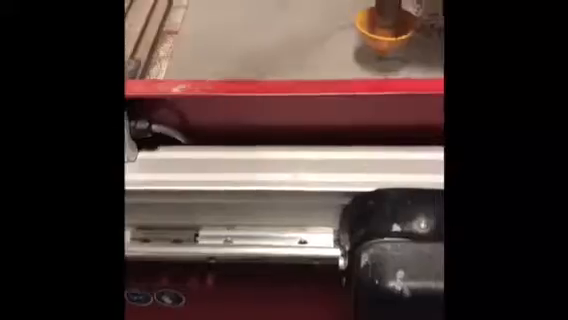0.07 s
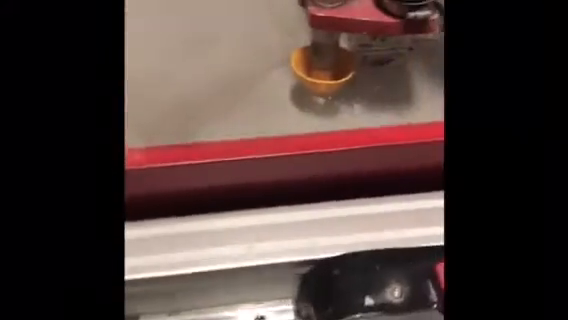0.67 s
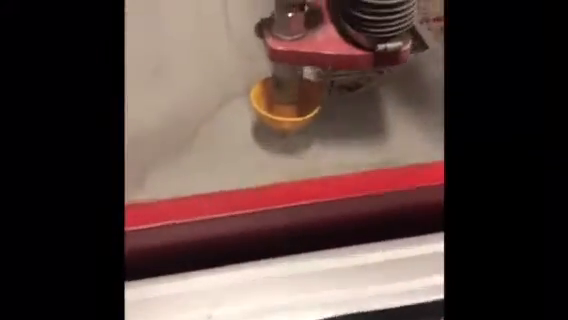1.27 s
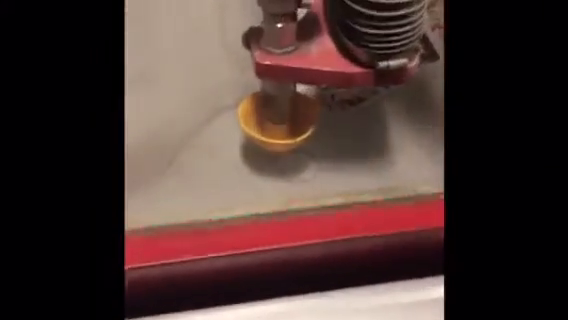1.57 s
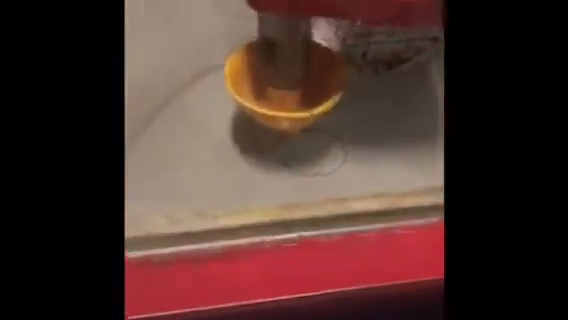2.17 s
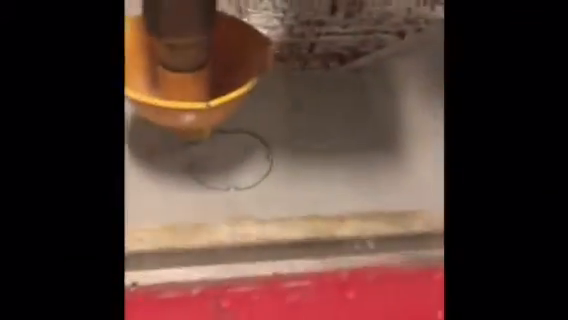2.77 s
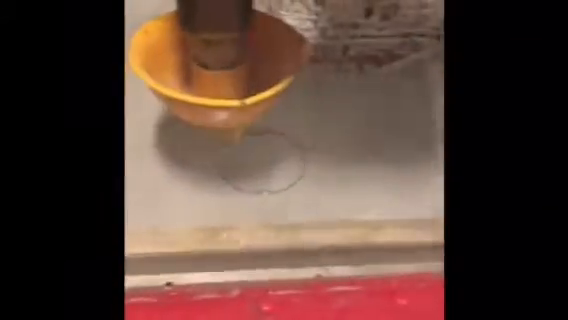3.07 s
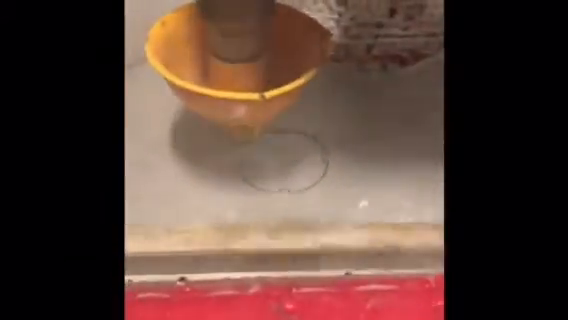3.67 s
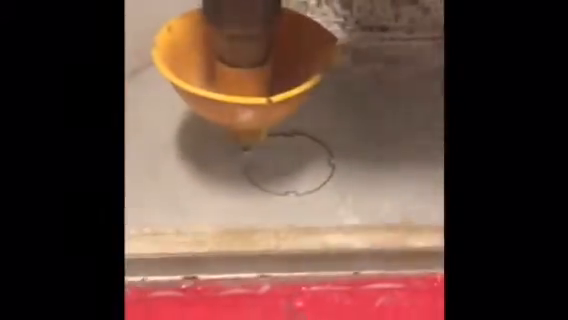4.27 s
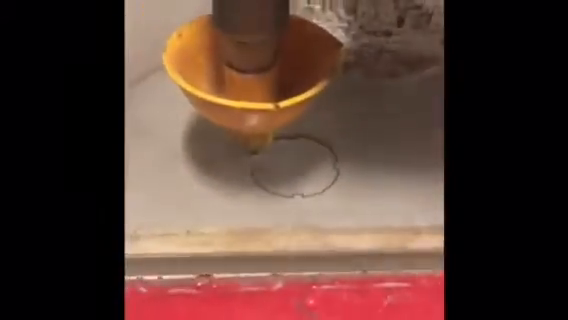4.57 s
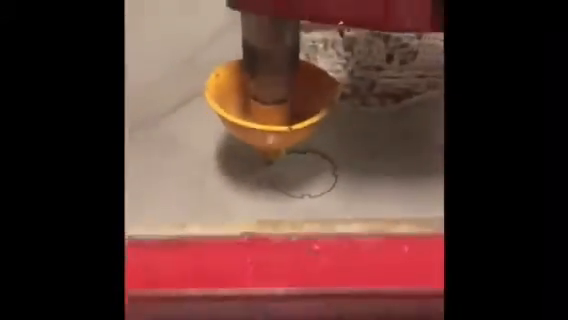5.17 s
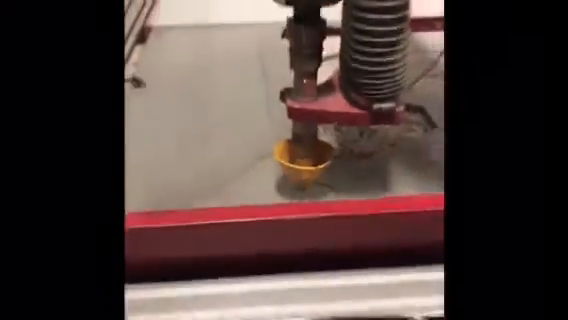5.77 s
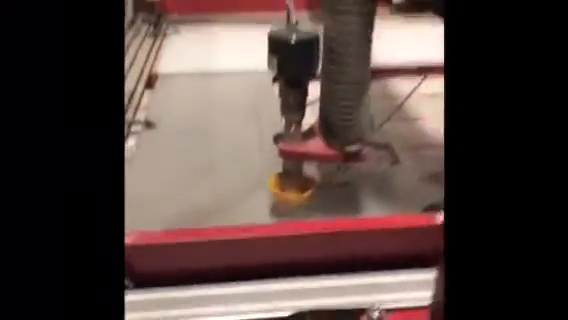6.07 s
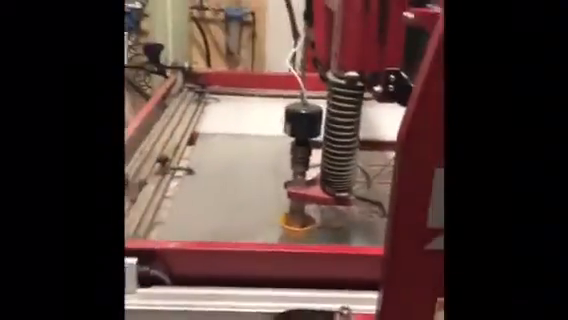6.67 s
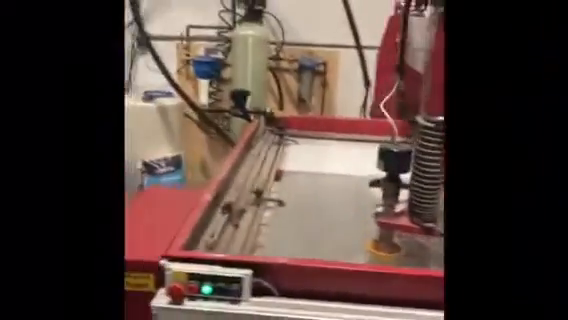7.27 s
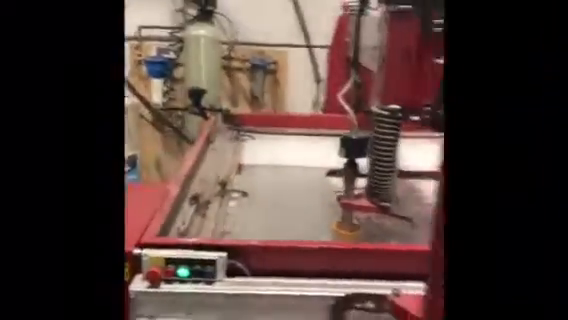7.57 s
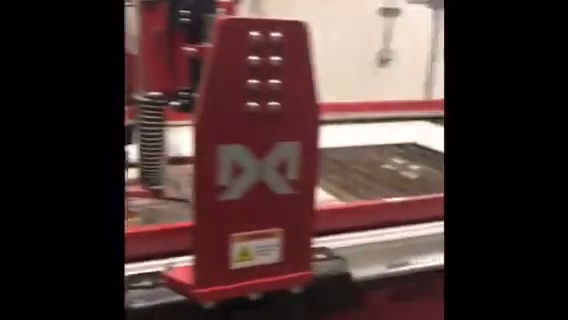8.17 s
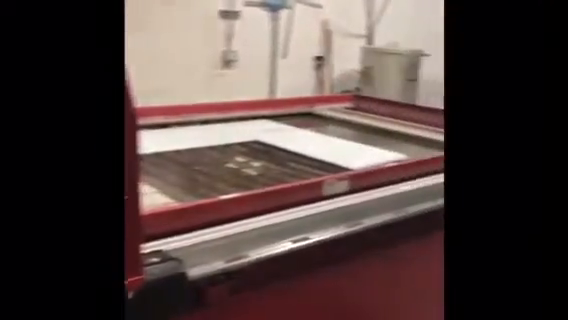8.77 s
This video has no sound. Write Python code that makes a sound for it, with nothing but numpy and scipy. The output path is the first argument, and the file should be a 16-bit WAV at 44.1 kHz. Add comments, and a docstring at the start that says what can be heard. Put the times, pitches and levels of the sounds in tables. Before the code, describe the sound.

A water jet cutter hisses and sputters loudly on stone, drops to a smooth hollow rush, then bites again over a faint pump hum.

```python
"""A workshop, at a water jet cutter on a stone slab; one small microphone leans in, steps back, walks round.
The jet sputters loudly while it bites, drops to a smooth hollow rush for two seconds, then bites again.
Slugs of water knock the sheet, whose bending waves arrive as falling chirps.
The spent jet churns the tank underneath, and the pressure pump hums behind."""
import sys
import numpy as np
from scipy import signal
from scipy.fft import rfft, irfft
from scipy.io import wavfile

SR = 44100
rng = np.random.default_rng(int(sys.argv[2]) if len(sys.argv) > 2 else 0)


def unload_audio(sound):
    """Save the sound as a 16-bit wav file, at the path given as the first command line argument."""
    columns = np.transpose(np.atleast_2d(sound))
    # keep every value between -1 and 1, then stretch to whole-number steps
    steps = np.round(np.clip(columns, -1, 1) * 32767)
    wavfile.write(sys.argv[1], SR, steps.astype(np.int16))


N = 398223
T = np.arange(N) / SR
HZ = np.maximum(np.arange(N // 2 + 1) * SR / N, 1)

# The valve opens, the jet runs free, the jet bites again.
OPEN_S, FREE_S, BITE_S = 0.086, 4.381, 6.541
# The microphone leans in to the nozzle, steps back, then goes round the gantry: start and end of each.
LEAN_S, STEP_BACK_S, ROUND_S = (1.68, 2.75), (4.9, 5.7), (6.94, 8.46)


def undb(db):
    """Decibels to gain."""
    return 10 ** (np.asarray(db) / 20)


def unit(x):
    """Scale to rms 1."""
    return x / np.std(x)


def response(points):
    """Gain at every frequency from (Hz, dB) points."""
    hz, db = np.transpose(points)
    return undb(np.interp(np.log(HZ), np.log(hz), db))


def colour(x, points):
    """Filter x through (Hz, dB) points; rms 1."""
    return unit(irfft(rfft(x) * response(points), N))


def blend(x, first, second, share):
    """Crossfade from one colour of x to another."""
    return (1 - share) * colour(x, first) + share * colour(x, second)


def walk(hz):
    """Smooth random wander, up to about hz; rms 1."""
    smooth = signal.butter(2, hz, fs=SR, output="sos")
    return unit(signal.sosfilt(smooth, rng.standard_normal(N)))


def step(at, rise):
    """Goes from 0 to 1 with a time constant, starting at a moment."""
    return 1 - np.exp(-np.maximum(T - at, 0) / rise)


def move(span):
    """Goes smoothly from 0 to 1 between two moments."""
    start, end = span
    return (1 - np.cos(np.pi * np.clip((T - start) / (end - start), 0, 1))) / 2


def swell(at, half):
    """A bell curve that rises to 1 at a moment and falls again."""
    return np.exp(-((T - at) / half) ** 2)


def spray(surge_db, sputter_db, crackle_db, grit_db, swing_db):
    """Countless droplet impacts; the jet surges, sputters and breaks into tiny slugs."""
    flow_db = surge_db * walk(9.9) + sputter_db * walk(170) + crackle_db * walk(850)
    # the pump supplies only so much: the spray swings between a lull and full flow
    flow_db = swing_db * np.tanh(flow_db / swing_db)
    mist = rng.standard_normal(N) * undb(flow_db + grit_db * rng.standard_normal(N))
    # single slugs strike as sharp one-sided snaps, more of them at full flow
    snaps = (rng.random(N) < 160 / SR * undb(flow_db)) * rng.uniform(2, 7, N)
    return unit(mist) - snaps


def scatter(x, share, sway_ms, span_ms, turn_count=10, count=13):
    """Many short reflections off the machine; each path changes length as the microphone moves."""
    fine = signal.resample_poly(x, 8, 1)  # for lags finer than a sample
    turns = np.linspace(0, T[-1], turn_count)
    out = x.copy()
    for place, sign, *drift in rng.uniform(-1, 1, (count, 2 + turn_count)):
        lag_ms = 1 + (span_ms - 1) * abs(place) + sway_ms * np.interp(T, turns, np.cumsum(drift))
        at = ((T - lag_ms / 1000) * 8 * SR).astype(int)
        out += np.sign(sign) * share / np.sqrt(count) * fine.take(at, mode="clip")
    return unit(out)


def cutting():
    """The jet bites the slab and throws spray back; colour and level depend on where one stands."""
    # The hiss from the front, close up, further back and side on. Each row: frequency in Hz, level in dB.
    front_colour = [(100, -28), (860, -25), (1080, -14), (1850, -12), (2110, -14.7), (3140, -6.7),
                    (3400, -9.2), (3790, -5.5), (4180, -8), (5730, -3.2), (12450, -5.3), (13220, 0),
                    (15590, -3)]
    close_colour = [(100, -18), (820, -13.9), (1850, -10.5), (2370, -13.5), (3010, -5.2), (3920, -7.1),
                    (5730, -3.9), (5990, 0.0), (7150, -5.5), (10510, -5.7), (11150, -1.6), (11540, -6.7),
                    (13090, -2.9), (15590, -4.6)]
    back_colour = [(100, -22), (820, -18.2), (2630, -10.1), (3920, -4.6), (4690, -6.7), (5080, -3.9),
                   (6240, 0.0), (7150, -11.1), (7800, -4.9), (8830, -6.3), (11410, -2.6), (12580, -6.4),
                   (13350, -3.3), (15590, -11.1)]
    side_colour = [(100, -28), (820, -18), (2240, -13), (3000, -8), (4600, -4), (5000, -1.5), (5600, -5.5),
                   (6400, -3.5), (7080, -14.5), (8050, -6.5), (9350, -11.5), (9730, -8), (12580, -9.7),
                   (13740, -7), (15590, -12)]
    # The spray falters briefly. Each row: centre in seconds, half length in seconds, dip in dB.
    lulls = [(.304, .006, -4), (0.526, .03, -4), (6.61, 0.014, -2.5), (6.976, 0.005, -1)]
    front_db, close_db, back_db, side_db = -13, -12, -15.5, -17
    near = spray(surge_db=0.35, sputter_db=2.0, crackle_db=4.5, grit_db=2.8, swing_db=8)
    far = spray(surge_db=0.0, sputter_db=2.5, crackle_db=2.2, grit_db=2.5, swing_db=5)
    near = scatter(near, share=0.35, sway_ms=0.14, span_ms=6)
    far = scatter(far, share=0.45, sway_ms=0.179, span_ms=10)
    close, side = move(LEAN_S), move(ROUND_S)
    lull_db = sum(db * swell(s, half) for s, half, db in lulls)
    shade_db = -2.5 * swell(7.95, 0.31)  # the gantry's upright comes between nozzle and microphone
    burst_db = 1.5 * (1 - step(BITE_S, 0.088))  # the spray overshoots as the jet bites again
    first_db = front_db + (close_db - front_db) * close + lull_db
    second_db = back_db + (side_db - back_db) * side + shade_db + lull_db + burst_db
    first = blend(near, front_colour, close_colour, 0.1 + 0.79 * close) * undb(first_db)
    # round the side the direct crackle gives way to smoother, reflected spray
    softening = np.sqrt(1 - side) * near + np.sqrt(side) * far
    second = blend(softening, back_colour, side_colour, 0.041 + 0.8 * side) * undb(second_db)
    return first * step(OPEN_S, 0.055) * (1 - step(FREE_S, 0.0018)) + second * step(BITE_S, 0.001)


def shifting(hiss):
    """Bands of the hiss swell, slide and hollow out as the microphone moves."""
    # Each row: strongest moment in seconds, half length in seconds, centre in Hz,
    # slide in Hz per second, half width in Hz, lift in dB.
    bands = [(.1, 0.49, 11900, 0, 500, 6), (0.444, .06, 4940, 2, 130, 11), (.8, 0.65, 13300, 0, 550, 2.5),
             (1.7, .65, 12200, -300, 380, -8), (1.85, .5, 8300, -300, 350, 2), (2.0, .7, 13300, -3, 350, 1),
             (2.45, .5, 10500, -600, 350, -3), (3.7, .5, 6050, 0, 220, 1.5),
             (4.98, 0.15, 2720, 300, 110, 4), (5.15, .2, 1500, 150, 90, 1.5), (5.25, 0.26, 1040, 0, 100, 5),
             (5.65, 0.2, 770, 200, 130, -11), (5.95, .35, 1770, 100.5, 90, -3),
             (6.0, .25, 11550, -900, 350, 3), (7.0, 0.32, 4000, 0, 130, 3), (7.3, .3, 6240, 0, 450, 0.5),
             (7.6, 0.9, 9850, -500, 500, 3.5), (8.6, .5, 5070, 0, 210, 3)]
    hz, t, frames = signal.stft(hiss, SR, nperseg=1024)
    lift_db = 0
    for s, half, centre, slide, width, db in bands:
        offset_hz = hz[:, None] - centre - slide * (t - s)
        lift_db += db * np.exp(-((t - s) / half) ** 2 - (offset_hz / width) ** 2)
    return signal.istft(frames * undb(lift_db), SR)[1][:N]


def bend(pushes, spread):
    """Bending waves travel as the root of frequency: each arrives spread / sqrt(Hz) seconds late."""
    # The sheet's answer to a knock. Each row: frequency in Hz, level in dB.
    knock_colour = [(25, -26), (50, -2.5), (130, 2.5), (300, 0.5), (600, 0), (900, -13.5), (2000, -25)]
    dispersion = np.exp(-4j * np.pi * spread * np.sqrt(HZ))
    return irfft(rfft(pushes) * response(knock_colour) * dispersion, N)


def knocking():
    """Slugs of water knock the sheet in the first cut: falling chirps, best heard close up."""
    # The loudest knocks. Each row: start in seconds, level in dB.
    strikes = [(0.983, -28.5), (1.164, -27), (1.708, -29), (1.828, -24), (2.076, -27), (2.203, -24.5),
               (2.252, -28), (2.3, -24), (2.381, -12.5), (2.488, -23), (2.641, -18.5), (2.695, -21),
               (2.735, -26), (2.766, -26), (2.793, -20), (2.878, -16.5), (2.926, -24), (2.956, -27),
               (3.032, -28), (3.057, -24), (3.145, -23), (3.17, -18), (3.208, -24), (3.281, -16.5),
               (3.294, -19), (3.376, -20), (3.47, -22.5), (3.559, -17.5), (3.65, -21), (3.741, -21),
               (3.797, -19), (3.884, -20), (3.984, -20), (4.012, -18), (4.052, -23), (4.192, -18.5),
               (4.25, -19)]
    trail_per_s, trail_db, trail_decay_s = 340, -9.5, 0.032
    patter_per_s, front_db, close_db, growth_db_per_s = 230, -53, -41, 1.5
    pushes = np.zeros(N)
    for s, db in strikes:
        pushes[int(s * SR)] += undb(db)
    chirps = bend(pushes, spread=0.15)
    # each knock drags a ragged trail of small slugs after it
    trail_size = signal.lfilter([1], [1, -np.exp(-1 / (trail_decay_s * SR))], pushes) * undb(trail_db)
    trail = (rng.random(N) < trail_per_s / SR) * rng.uniform(-0.75, 1, N) * trail_size
    knocks = (chirps + bend(trail, spread=0.18)) * pushes.max() / np.abs(chirps).max()
    # lesser knocks patter throughout the cut
    slugs = (rng.random(N) < patter_per_s / SR) * rng.uniform(-1, 1, N)
    patter_db = front_db + (close_db - front_db) * move(LEAN_S) + growth_db_per_s * (T - OPEN_S)
    patter = unit(bend(slugs, spread=0.16)) * undb(patter_db)
    return knocks + patter * step(OPEN_S, 0.027) * (1 - step(FREE_S, 0.018))


def ring(x, hz, width_hz):
    """Pass x through a steep-sided resonance; rms 1."""
    return unit(irfft(rfft(x) / (1 + 1.8 * ((HZ - hz) / width_hz) ** 2), N))


def tank():
    """The spent jet churns the water under the slab; it dies down, then returns as the jet runs free."""
    # The churning water. Each row: frequency in Hz, level in dB.
    churn_colour = [(25, -50), (55, -23), (90, -6), (155, 0.5), (200, -3), (260, -5.5), (350, -6),
                    (480, -7), (720, -6), (900, -16.5), (2000, -20.5)]
    first_db, free_db, second_db = -42, -38, -41
    settle_db_per_s, side_lift_db = 7, 5.5
    churn = colour(rng.standard_normal(N) * undb(2.2 * walk(6.3)), churn_colour)
    first = undb(first_db - settle_db_per_s * (T - OPEN_S))
    later = undb(free_db + (second_db - free_db) * step(BITE_S, 0.13) + side_lift_db * move(ROUND_S))
    # a hollow note of the tank comes up as the microphone steps back
    note = ring(rng.standard_normal(N), hz=357, width_hz=90) * undb(-44) * swell(5.5, 0.16)
    return churn * (first + later * step(FREE_S, 0.031)) + note


def tone(hz, db, waver):
    """A machine tone that wavers slightly in pitch and level."""
    size = np.sqrt(2) * undb(db + walk(2.6))
    pitch_hz = hz * (1 + waver * walk(5.33))
    return size * np.sin(2 * np.pi * np.cumsum(pitch_hz) / SR)


def pump():
    """The pressure pump hums and whines; the hum grows as one steps back and walks round the gantry."""
    # The low hum and the steady whine. Each row: frequency in Hz, level in dB (relative for the hum).
    hum_lines = [(96.5, -4.5), (161, -16.5), (258, -9), (479, -11), (738, -10)]
    whine_lines = [(2256, -54)]
    front_db, back_db, side_db = -66, -50, -41
    hum = unit(sum(tone(hz, db, waver=0.011) for hz, db in hum_lines))
    hum_db = front_db + (back_db - front_db) * move(STEP_BACK_S) + (side_db - back_db) * move(ROUND_S)
    whine = sum(tone(hz, db, waver=0.00201) for hz, db in whine_lines)
    return hum * undb(hum_db) + whine


def mirror(x, strength):
    """Hard faces nearby reflect the jet and comb its spectrum; the paths slide as the microphone moves."""
    # Moments along the microphone's way, in seconds.
    moments = (4.38, 4.95, 5.5, 6.0, 6.54)
    # The reflections. Each row: gain at full strength, then lag in milliseconds at each moment.
    paths = [(-.3, 1.503, 1.446, 1.441, 1.644, 1.8), (-.19, 1.311, 1.287, 1.312, 1.219, 1.09),
             (.16, 1.255, 1.24, 1.262, 1.4, 1.5), (.16, .677, .684, .687, .692, .617),
             (.11, .623, .625, .619, .62, .84), (-.1, .572, .572, .56, .5, .45),
             (-.14, 2.405, 2.357, 2.283, 2.315, 2.31), (-.12, 1.747, 1.67, 1.59, 1.557, 1.696),
             (.12, 2.232, 2.191, 2.147, 1.999, 1.987), (.12, 2.824, 2.724, 2.744, 2.725, 2.632),
             (.13, 1.443, 1.392, 1.494, 1.71, 1.85)]
    fine = signal.resample_poly(x, 16, 1)
    out = x.copy()
    for gain, *lags_ms in paths:
        lag_s = np.interp(T, moments, lags_ms) / 1000
        at = np.rint((T - lag_s) * 16 * SR).astype(int)
        out += strength * gain * fine.take(at, mode="clip")
    return unit(out)


def rushing():
    """The free jet is smoother, and hollow through reflections that thin out as one steps back."""
    # The free jet close up and from further back. Each row: frequency in Hz, level in dB.
    near_colour = [(100, -27), (800, -3), (1050, -2.5), (1250, -2), (1450, 0), (2100, -0.5), (3150, 0.5),
                   (3400, -0.5), (4000, 1), (4750, -1.5), (5300, 1.5), (5850, -2), (6300, 2), (6800, -2),
                   (7900, 1.5), (8700, -2.5), (11400, -.5), (12300, -4), (13100, -1.5), (15600, -6)]
    far_colour = [(100, -15), (560, -5), (820, -7.5), (1100, 0.5), (1500, -.5), (1900, -1.5), (3100, .5),
                  (3900, -0.5), (5300, 0), (5900, 0.5), (6900, -5.5), (8100, -1), (9500, -3.5),
                  (11500, 0.5), (12800, -2.5), (15600, -8)]
    # Its loudness at the microphone. Each row: time in seconds, level in dB.
    levels = [(4.8, -23), (5.17, -20.5), (5.8, -23.5), (6.45, -22)]
    jet = spray(surge_db=0.8, sputter_db=1.2, crackle_db=2.0, grit_db=1.0, swing_db=7)
    away = move(STEP_BACK_S)
    near = colour(jet, near_colour)
    far = scatter(colour(jet, far_colour), share=0.5, sway_ms=0.2005, span_ms=4.5, turn_count=24)
    rush = mirror((1 - away) * near + away * far, strength=1 - 0.53 * away)
    level_db = np.interp(T, *np.transpose(levels))
    return rush * undb(level_db) * step(FREE_S, 0.0041) * (1 - step(BITE_S, 0.035))


def scene():
    """Jet, sheet, tank and pump at one moving microphone."""
    hiss = shifting(cutting() + rushing())
    knocks = knocking()
    background = (tank() + pump()) * step(OPEN_S, 0.045)
    return (hiss + knocks + background)[None]


def record(dry):
    """The small microphone loses the deepest bass; the recorder clips rare peaks and cuts the top."""
    bass_cut = signal.butter(3, 38, "highpass", fs=SR, output="sos")
    top_cut = signal.firwin(801, 15800, fs=SR, window="blackman")
    clipped = np.clip(signal.sosfilt(bass_cut, dry), -0.9, 0.9)
    return signal.fftconvolve(clipped, top_cut[None], mode="same")


dry = scene()
out = record(dry)
unload_audio(out)
```